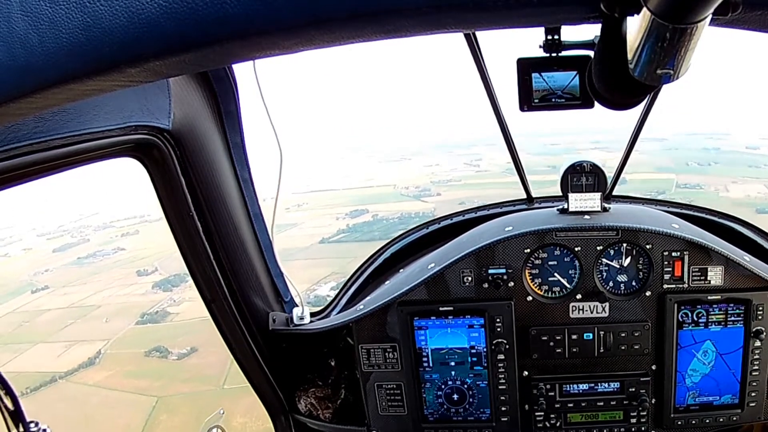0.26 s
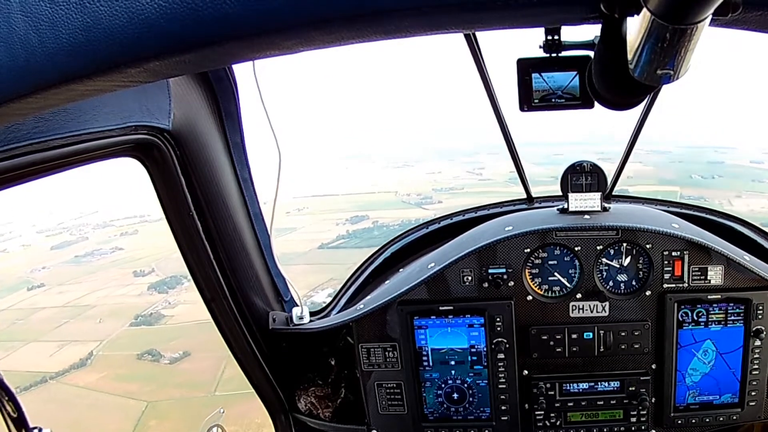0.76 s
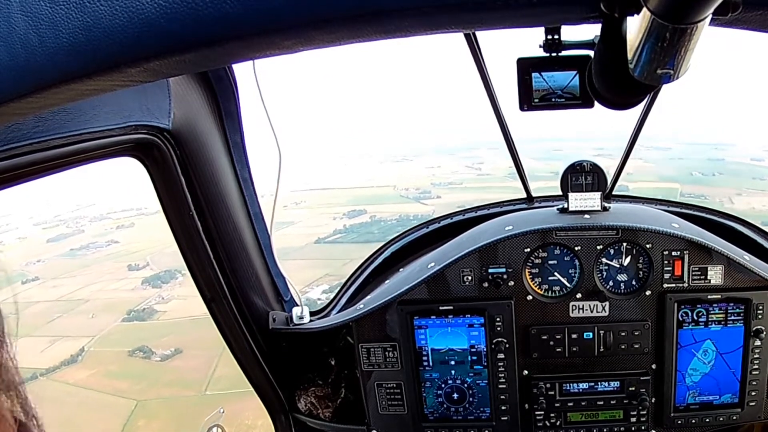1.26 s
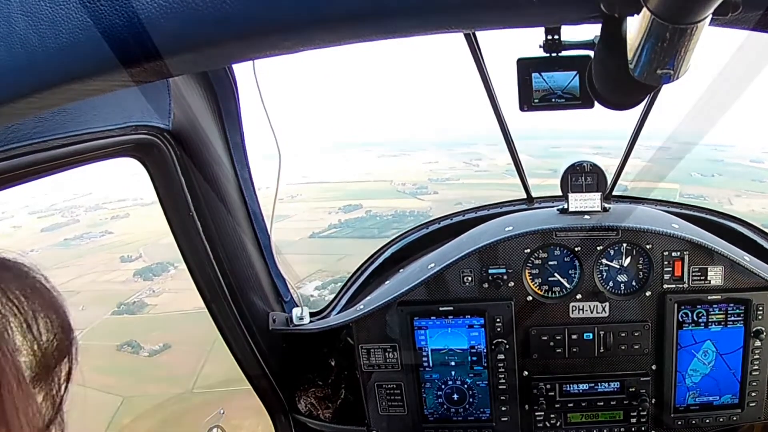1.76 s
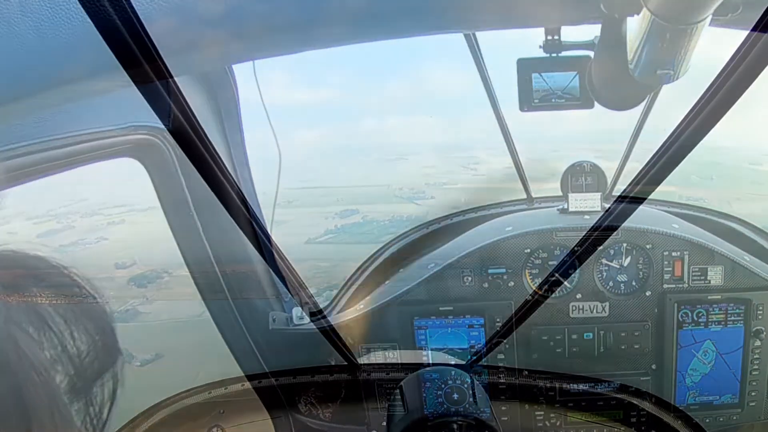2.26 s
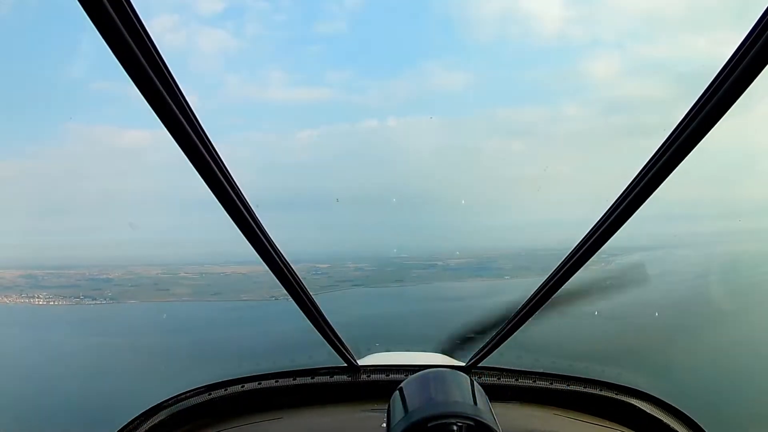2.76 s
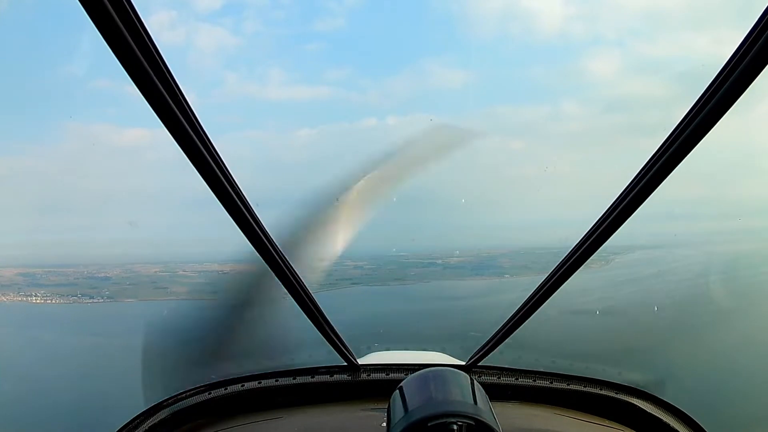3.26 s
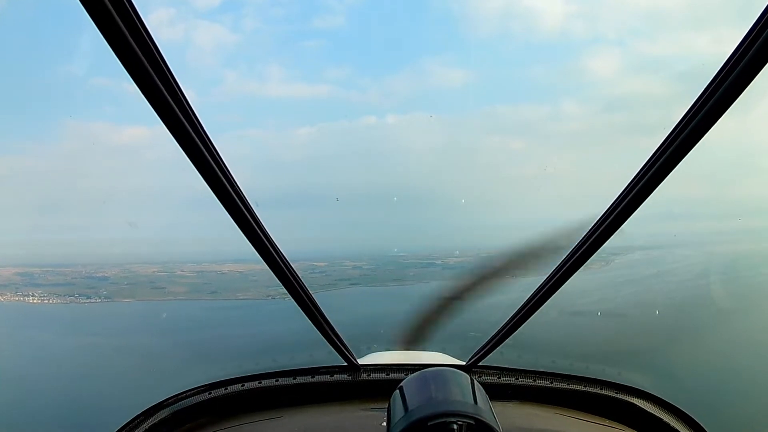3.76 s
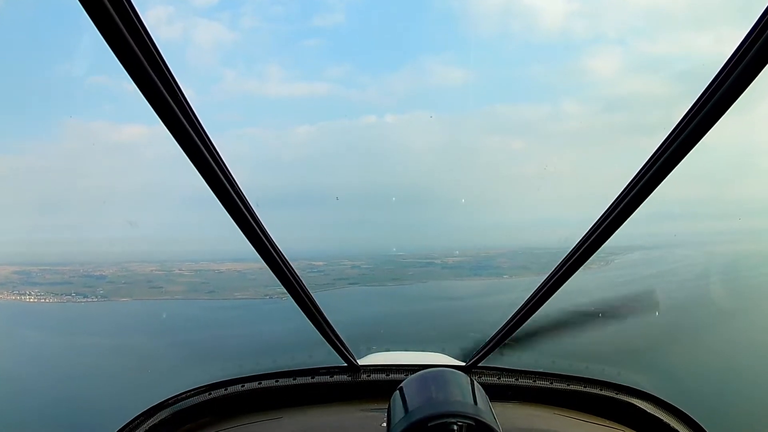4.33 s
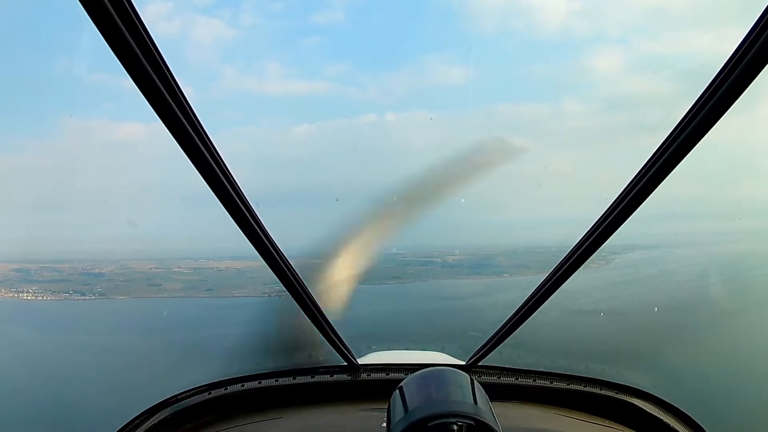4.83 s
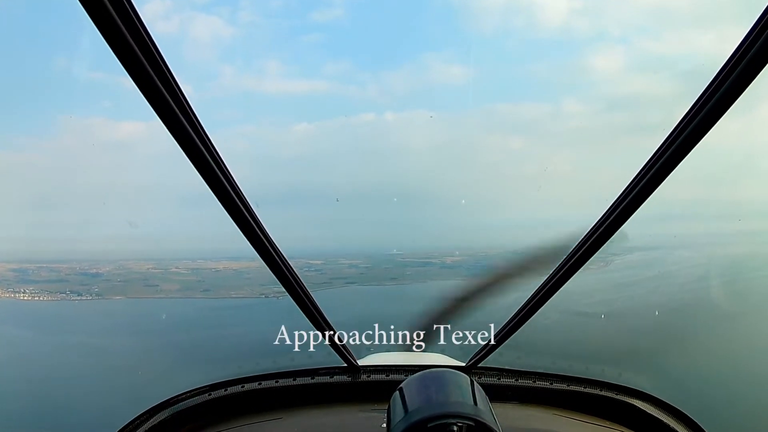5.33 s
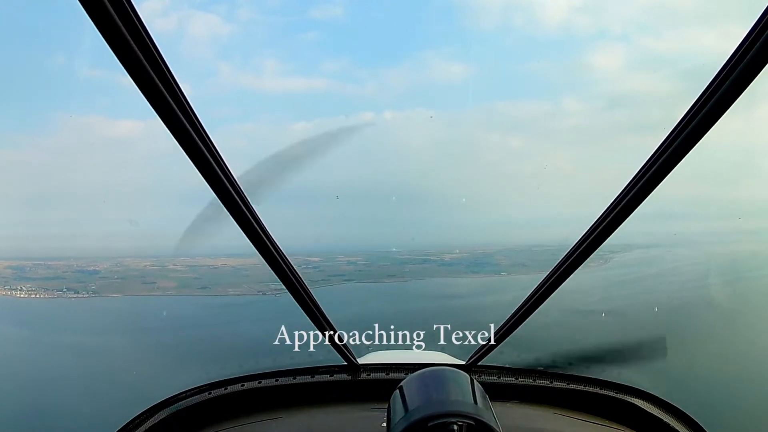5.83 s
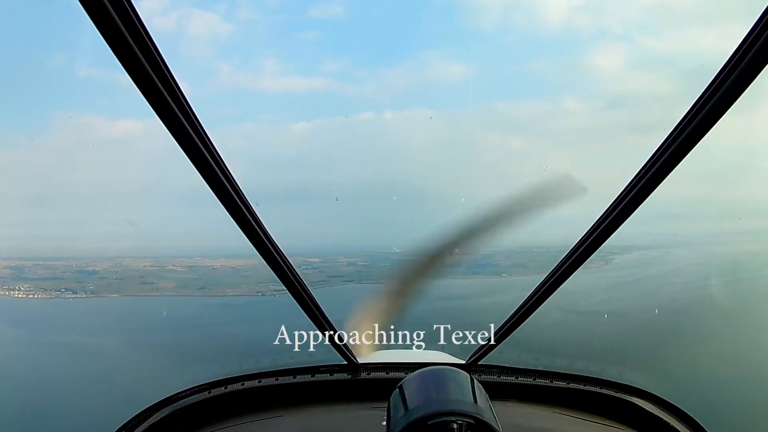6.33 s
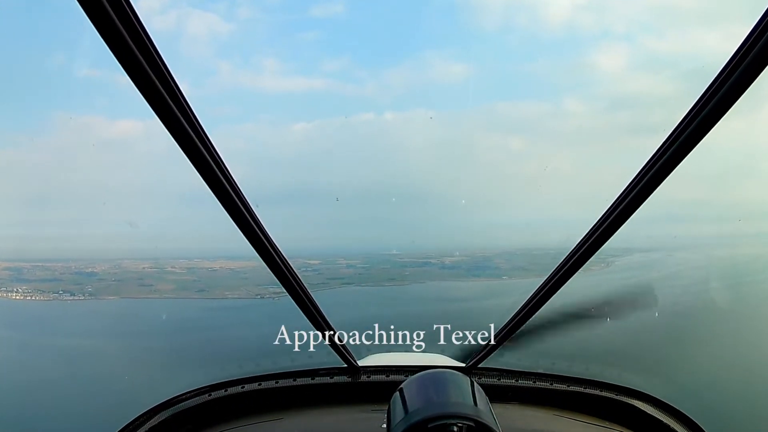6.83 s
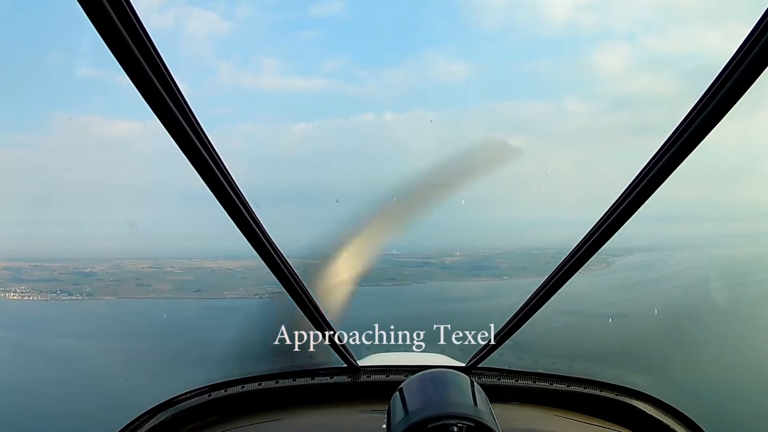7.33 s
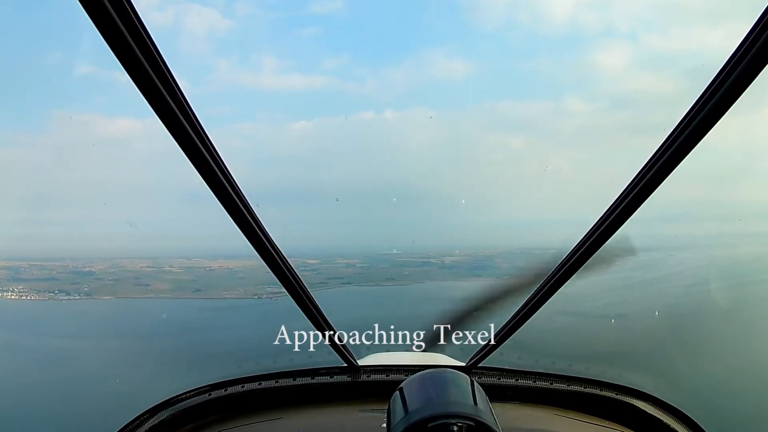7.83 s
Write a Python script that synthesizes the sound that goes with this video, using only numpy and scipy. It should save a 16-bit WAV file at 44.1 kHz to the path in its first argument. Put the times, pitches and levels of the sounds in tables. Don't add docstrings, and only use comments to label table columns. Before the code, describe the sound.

Inside a small propeller aircraft in cruise, a low throbbing engine drone mixes with rushing air and a faint breathy vent whistle. Before two seconds it cuts abruptly, with a slight click, to a much louder, slightly higher engine buzz with strong propeller hum and dense wind roar. A small microphone near the windscreen sounds compressed and strained. The roar then holds steadily to the end.

```python
import sys
import numpy as np
from scipy import signal
from scipy.fft import rfft, irfft, next_fast_len
from scipy.io import wavfile
from scipy.ndimage import uniform_filter1d, minimum_filter1d

SR = 44100
rng = np.random.default_rng(int(sys.argv[2]) if len(sys.argv) > 2 else 0)


def materialize(psi):
    bounded = np.clip(np.atleast_2d(psi).T, -1, 1)
    quanta = np.round(bounded * 32767).astype(np.int16)
    wavfile.write(sys.argv[1], SR, quanta)


def invert_db(level):
    return 10 ** (np.asarray(level, dtype=float) / 20)


N = 356769


def walk(rate):
    hop = 64
    hold = int(SR / rate / hop)
    steps = np.repeat(rng.standard_normal(N // hop // hold + 2), hold)
    slow = uniform_filter1d(uniform_filter1d(steps, hold), hold)
    return 1.31 * np.interp(np.arange(N) / hop, np.arange(len(slow)), slow)


def curve(table):
    return np.interp(np.arange(N) / SR, *np.transpose(table))


def resonances(hz, table):
    return invert_db(sum(db * np.exp(-(2 * (hz - centre) / width) ** 2) for centre, width, db in table))


# frequency in Hz, level in dB per Hz.
SEAT_ROAR = [(15, -80), (100, -51.5), (230, -50.5), (320, -59.5), (1400, -70.5), (2800, -86), (4800, -88.5),
             (14000, -119)]
SCREEN_ROAR = [(50, -60.5), (100, -48.5), (750, -52.5), (1500, -63), (2700, -65.5), (3100, -76.5),
               (4700, -72.5), (14000, -112)]
# frequency in Hz, width in Hz, lift in dB
SEAT_PANELS = [(50, 25, -8), (180, 40, -11), (534, 200, 3), (820, 320, -0.5), (3970, 180, 3),
               (4420, 90, 4.5), (5050, 430, -1.5), (6340, 72, 6), (7100, 1500, 3)]
SCREEN_PANELS = [(181, 46, -6), (409, 23, 4.5), (548, 280, -4), (813, 100, -2), (1864, 230, -1),
                 (2056, 30, 6.5), (2233, 43, 3), (2780, 18, 5.5), (3080, 57, 6.5), (3260, 60, 5),
                 (3760, 200, 2), (4054, 64, 8), (4475, 70, 4.5), (6700, 81, 3)]


def slipstream(spectrum, panels, gust_db, flicker_db):
    size = next_fast_len(N)
    hz = np.maximum(np.fft.rfftfreq(size, 1 / SR), 1)
    spectrum_hz, spectrum_db = np.transpose(spectrum)
    colour = invert_db(np.interp(np.log(hz), np.log(spectrum_hz), spectrum_db)) * np.sqrt(SR / 2)
    noise = rfft(rng.standard_normal(size)) * colour * resonances(hz, panels)
    place = np.clip(2 * np.log2(hz / 20), 0, 19)
    gust = walk(1.2)
    total = np.zeros(N)
    for k in range(20):
        band = irfft(noise * np.maximum(1 - abs(place - k), 0), size)[:N]
        total += band * invert_db(gust_db * gust + flicker_db * walk(9))
    return total


# frequency in Hz, width in Hz, level in dB.
SEAT_VENT = (2270, 360, -44)


def vent(centre_hz, width_hz, db):
    hz = np.fft.rfftfreq(N, 1 / SR)
    whistle = irfft(rfft(rng.standard_normal(N)) / (1 + (2 * (hz - centre_hz) / width_hz) ** 2), N)
    level_db = db + 0.1 * curve(SEAT_LOAD) - 0.1 + 0.7 * walk(13.5)
    return whistle / whistle.std() * invert_db(level_db)


def lines(phases, levels_db, waver_db):
    total = np.zeros(N)
    for phase, db in zip(phases, levels_db):
        total += np.sqrt(2) * invert_db(db + waver_db * walk(2.955)) * np.cos(phase)
    return total


PROP = [(1, 0), (2, 0), (3, 0), (4, 0), (6, 0), (8, 0), (10, 0), (12, 0), (2, 4), (-2, 4), (4, 4), (2, 5)]
SEAT_PROP = [-38.5, -22.5, -60, -30, -58, -43.5, -63, -52.5, -40, -52, -43, -62.5]
SCREEN_PROP = [-52, -17.5, -50, -30, -30, -44.5, -43.5, -47, -27, -31, -51.5, -37.5]
# time in seconds, change in dB.
SEAT_LOAD = [
    (0, 0),
    (.2, 3.5),
    (.4, 0),
    (.6, -1.5),
    (.8, -3.5),
    (1.2, -3),
    (1.7, -2.5),
]


def propeller(cycle, levels_db, load_db):
    gear = 21 / 51
    shaft = 2 * gear * cycle
    phases = []
    for of_shaft, of_cycle in PROP:
        lag = 1.1 if of_cycle else 1.1 * (of_shaft - 2) ** 2
        phases.append(of_shaft * shaft + of_cycle * cycle + lag)
    return invert_db(load_db) * lines(phases, levels_db, waver_db=0.0)


# frequency in Hz, width in Hz, level in dB.
SEAT_FRAME = [(483, 310, -47), (932, 60, -38.5), (1190, 270, -49.5), (1394, 190, -55), (1666, 80, -54)]
SCREEN_FRAME = [(410, 100, -44), (567.4, 67, -34), (729, 60, -31.5), (907.6, 102, -29.5), (1132.6, 85, -37),
                (1428, 280, -47.5), (1844, 220, -57.5)]


def knocks(cycle_hz, frame, odd_db):
    order = np.arange(9, 44 + 1)
    ring = []
    for mode, (hz, width, db) in enumerate(frame):
        early = 0.4 * ((mode + 1) % 2)
        response = 1 / (1 + 2j * (order * cycle_hz - hz) / width) ** 2
        ring.append(invert_db(db) * np.exp(2j * np.pi * order * early) * response)
    power_db = 10 * np.log10(np.sum(np.abs(ring) ** 2, axis=0))
    return list(zip(order, power_db + odd_db * (order % 2), np.angle(sum(ring))))


# multiple of the engine cycle, level in dB.
SEAT_ENGINE = [(1, -47), (2, -36), (3, -50.5), (4, -39.5), (6, -30)]
SCREEN_ENGINE = [(2, -36), (4, -14), (5, -30.5), (6, -24), (7, -39.5), (8, -31.5)]


def engine(cycle, cycle_hz, tones, frame, odd_db):
    gas = [(k, db, -0.12 * (k - 4) ** 2) for k, db in tones]
    orders = gas + knocks(cycle_hz, frame, odd_db)
    phases = [k * cycle + angle for k, _, angle in orders]
    return lines(phases, [db for _, db, _ in orders], waver_db=0.5)


# time in seconds, rate in Hz.
SEAT_REVS = [(0, 40.55), (1.7, 40.58)]
SCREEN_REVS = [(1.7, 44.33), (4.5, 44.33), (4.9, 44.25), (5.4, 44.33)]


def cabin(revs, tones, frame, odd_db, prop_db, load_db, air):
    cycle = 2 * np.pi * np.cumsum(curve(revs) + 0.01993 * walk(2.002)) / SR
    motor = engine(cycle, revs[0][1], tones, frame, odd_db)
    return motor + propeller(cycle, prop_db, load_db) + air


# frequency in Hz, width in Hz, gain in dB.
PORT = [
    (7970, 510, -24),
    (11100, 3600, 5),
    (13400, 500, -17.5),
    (14500, 900, 4.5),
]


def microphone(x):
    ceiling, hold, edge = 0.468, int(0.0009 * SR), 1024
    bass_hz, top_hz = 24, 15200
    gain = minimum_filter1d(np.minimum(1, ceiling / (abs(x) + 1e-9)), 2 * hold + 1)
    limited = x * uniform_filter1d(uniform_filter1d(gain, hold), hold)
    padded = np.pad(limited, edge, "reflect")
    size = next_fast_len(len(padded))
    hz = np.fft.rfftfreq(size, 1 / SR)
    ends = hz ** 2 / (hz ** 2 + bass_hz ** 2) / (1 + (hz / top_hz) ** 40)
    return irfft(rfft(padded, size) * resonances(hz, PORT) * ends, size)[edge:edge + N]


def scene():
    seat_air = slipstream(SEAT_ROAR, SEAT_PANELS, gust_db=-0.5, flicker_db=1.2) + vent(*SEAT_VENT)
    seat = microphone(cabin(SEAT_REVS, SEAT_ENGINE, SEAT_FRAME, -5, SEAT_PROP,
                            curve(SEAT_LOAD), seat_air))
    screen_air = slipstream(SCREEN_ROAR, SCREEN_PANELS, gust_db=0.2, flicker_db=0.6)
    screen = microphone(cabin(SCREEN_REVS, SCREEN_ENGINE, SCREEN_FRAME, 0, SCREEN_PROP,
                              0, screen_air))
    change = int(1.67567 * SR)
    step, decay_s = -0.22, 0.0008
    jump = seat[change] + step - screen[change]
    settling = jump * np.exp(-np.arange(N - change) / SR / decay_s)
    return np.concatenate([seat[:change], screen[change:] + settling])[None]


def roll_off(x):
    return signal.sosfilt(signal.butter(12, 15300, fs=SR, output="sos"), x)


def record(dry):
    from_end_s = np.minimum(np.arange(N), np.arange(N)[::-1]) / SR
    eased = dry * np.minimum(1, 0.55 + from_end_s / 0.004)
    return roll_off(eased)


dry = scene()
out = record(dry)
materialize(out)
```